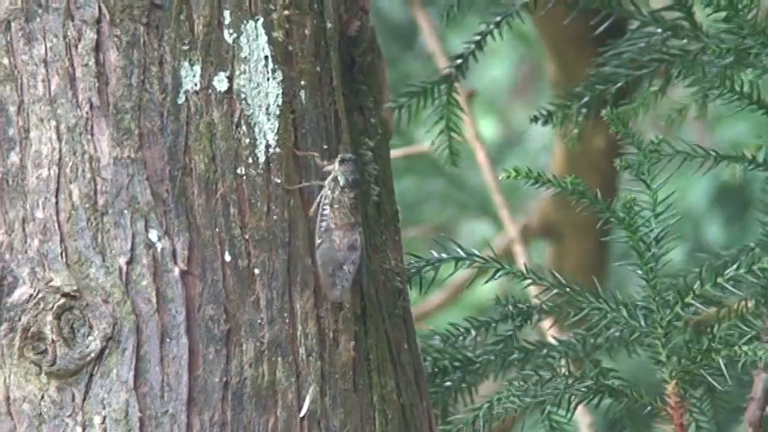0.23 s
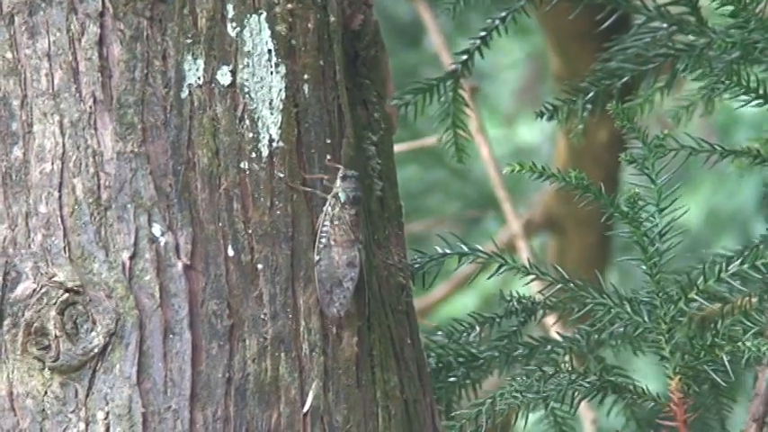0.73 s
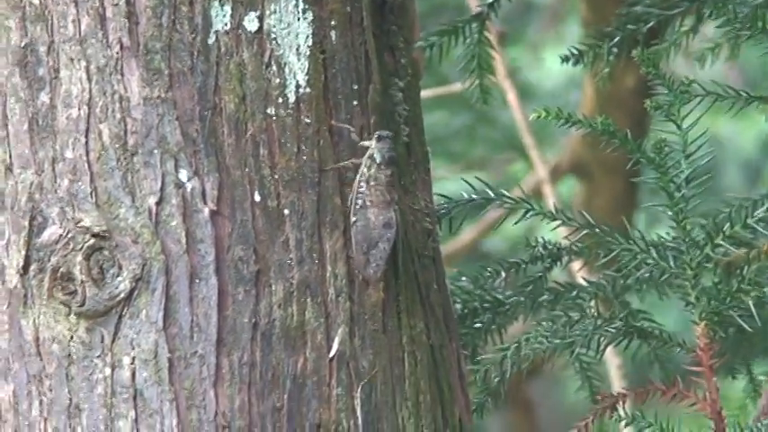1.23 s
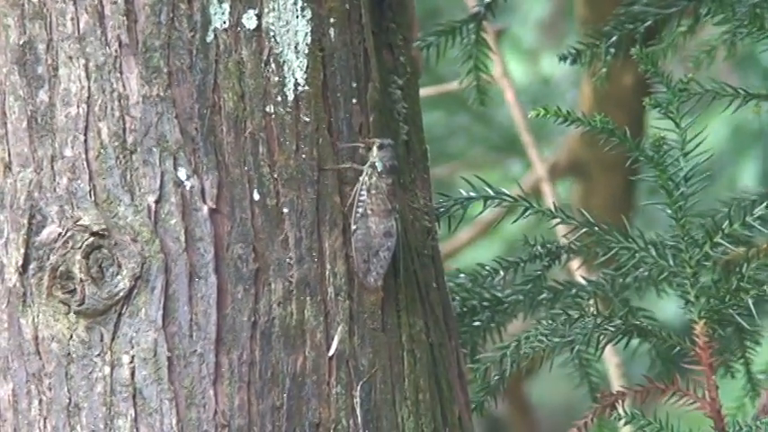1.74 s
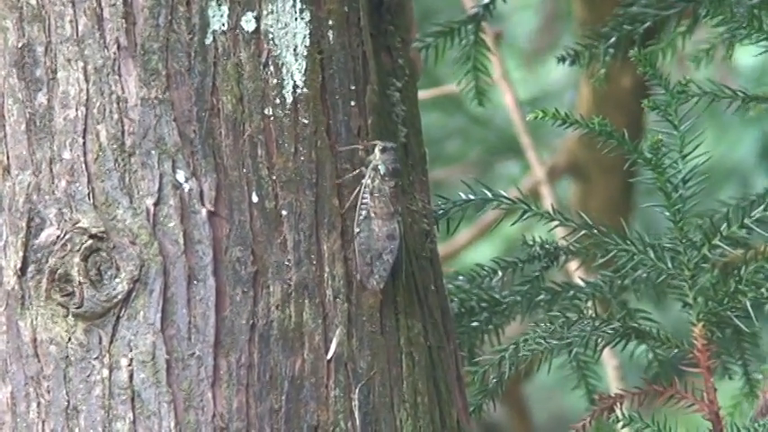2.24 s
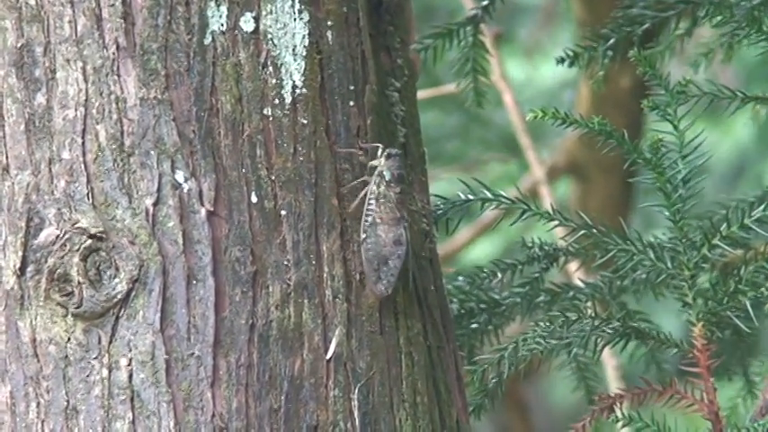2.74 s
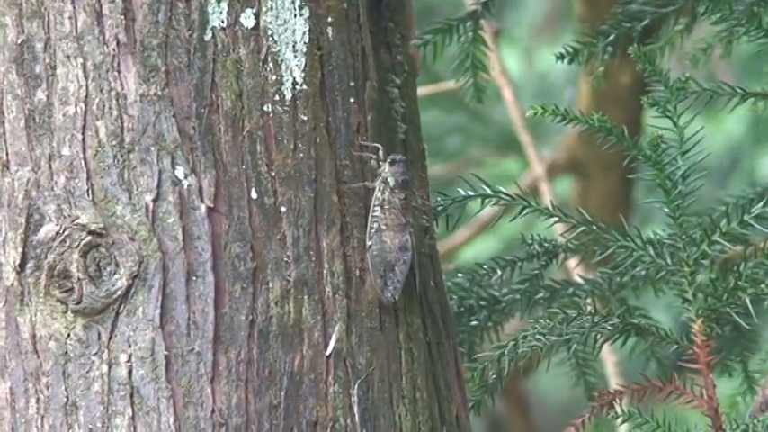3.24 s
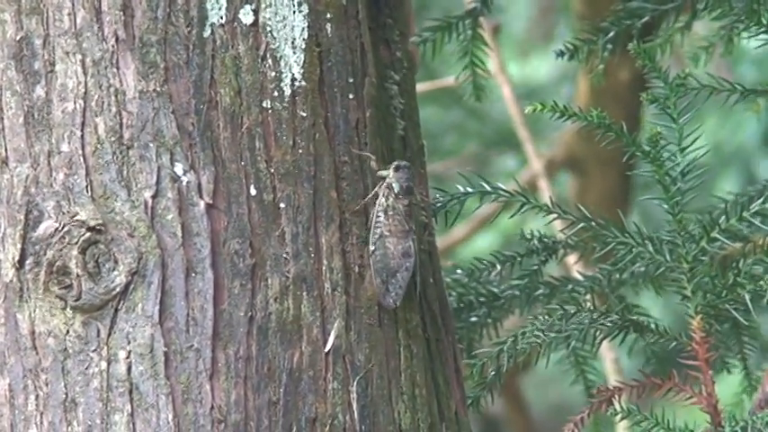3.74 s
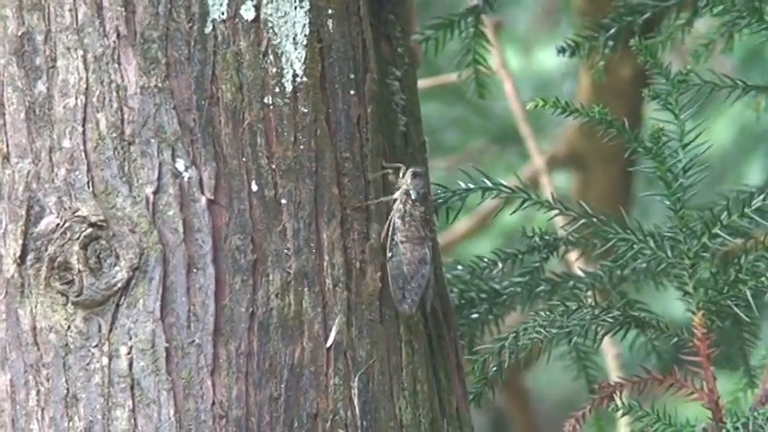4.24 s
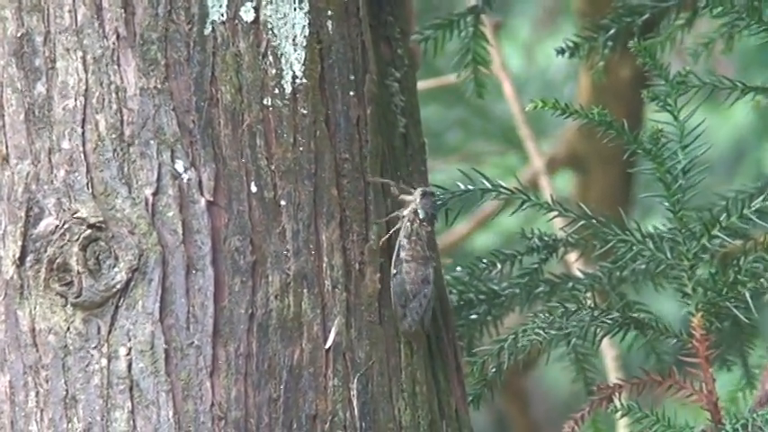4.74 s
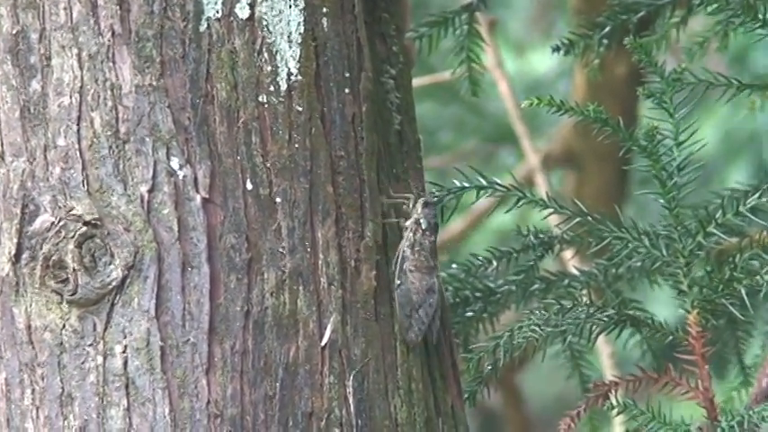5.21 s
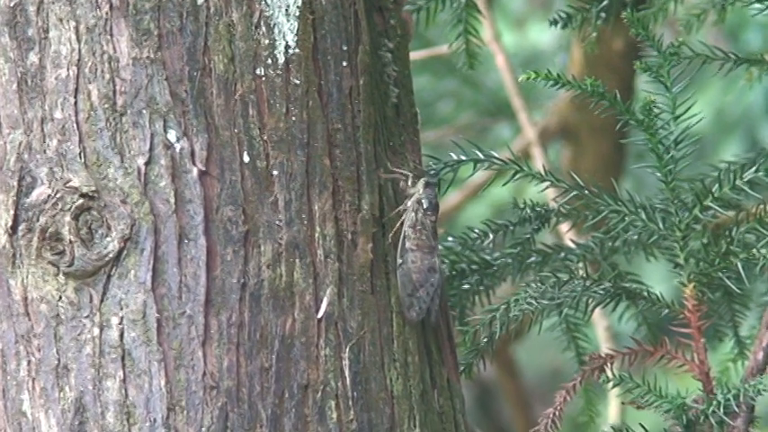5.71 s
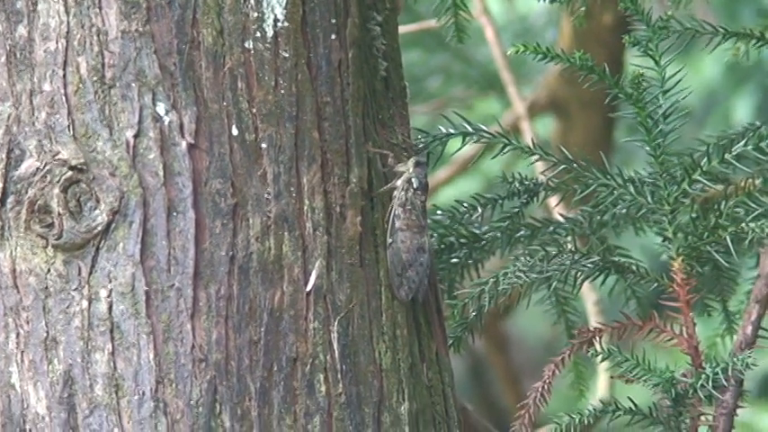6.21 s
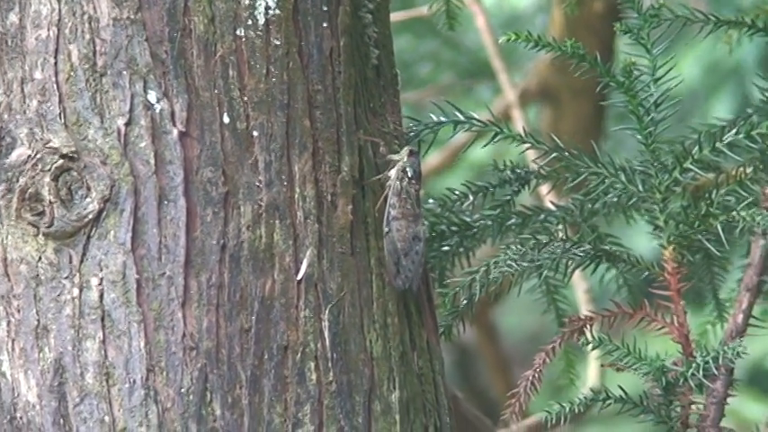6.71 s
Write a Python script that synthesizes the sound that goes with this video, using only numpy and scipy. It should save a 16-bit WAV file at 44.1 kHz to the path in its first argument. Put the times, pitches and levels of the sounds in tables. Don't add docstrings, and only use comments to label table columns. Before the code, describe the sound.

A cicada on a nearby trunk begins pulsing bright, buzzy chirps about three a second, with sagging drone between, over a dense hissing insect chorus in woodland.

```python
import sys
import numpy as np
from scipy import signal
from scipy.fft import rfft, irfft, next_fast_len
from scipy.io import wavfile

SR = 44100
rng = np.random.default_rng(int(sys.argv[2]) if len(sys.argv) > 2 else 0)


def to_wav(sig):
    pcm = np.clip(np.atleast_2d(sig), -1, 1) * 32767
    pcm = np.round(pcm).astype(np.int16)
    wavfile.write(sys.argv[1], SR, pcm.T)


def volts(x):
    e = np.asarray(x, float) / 20
    return 10 ** e


N = 306936
TIME = np.arange(N) / SR
LEFT_RIGHT = np.array([[1], [-1]])


def rms_one(x):
    return x / np.sqrt(np.mean(x ** 2) + 1e-20)


def in_time(rows, silent=None):
    s, *columns = np.transpose(rows)
    return [np.interp(TIME, s, column, silent, silent) for column in columns]


def at_hz(points, hz):
    point_hz, value = np.array(points)[:, :2].T
    return np.interp(np.log(hz + 1), np.log(point_hz), value)


def drift(rate):
    r = np.exp(-16 * np.pi * rate / SR)
    noise = rng.standard_normal(N // 8 + 8002)
    slow = signal.lfilter([1], [1, -2 * r, r * r], noise)[8000:]
    return np.interp(np.arange(N) / 8, np.arange(len(slow)), rms_one(slow))


def pan(x, db):
    return x * volts(LEFT_RIGHT * db / 2)


def swells(rows, rise, hold, fall):
    out = np.zeros(N)
    for s, db in rows:
        i = max(int((s - rise) * SR), 0)
        part = slice(i, i + SR // 2)
        t = TIME[part] - s
        attack = np.clip(t / rise + 1, 0, 1) ** 2
        out[part] += volts(db) * attack * np.exp(-np.maximum(t - hold, 0) / fall)
    return out


def spells(rows, edge, droop_db=0):
    out = np.zeros(N)
    for s, length, db in rows:
        part = slice(max(int((s - edge) * SR), 0), int((s + length + edge) * SR))
        t = TIME[part] - s
        shape = np.clip(np.minimum(t, length - t) / edge + .5, 0, 1) ** 2
        out[part] += volts(db + droop_db * (t - length / 2)) * shape
    return out


def bumps(rows, width):
    out = np.zeros(N)
    for s, db in rows:
        part = slice(max(int((s - 4 * width) * SR), 0), int((s + 4 * width) * SR))
        out[part] += volts(db) * np.exp(-((TIME[part] - s) / width) ** 2)
    return out


# frequency in Hz, likeness from 0 to 1.
LIKENESS = [(30, 0.4), (110, 0.98), (300, 0.52), (900, 0.15), (2000, 0.56), (5000, 0.97), (8000, 0.86),
            (10000, 0.78), (13000, 1)]


def hiss(spectrum, patchy_db, rate, count):
    size = next_fast_len(N)
    hz = np.arange(size // 2 + 1) * SR / size
    low, high = spectrum[0][0], spectrum[-1][0]
    level = volts(at_hz(spectrum, hz)) * (hz > low) * (hz < high)
    mid, side = rfft(rng.standard_normal((2, size))) * level
    alike = np.clip(at_hz(LIKENESS, hz), 0, 1)
    pair = np.sqrt(1 + alike) * mid + np.sqrt(1 - alike) * side * LEFT_RIGHT
    place = np.log((hz + 1) / low) / np.log(high / low) * (count - 1)
    shared = drift(rate / 4)
    out = 0
    for k in range(count):
        band = irfft(pair * np.clip(1 - abs(place - k), 0, 1), size)[:, :N]
        out = out + band * volts(patchy_db * (shared / 2 + drift(rate)))
    return rms_one(out)


# frequency in Hz, level in dB per Hz.
WOOD = [(76, -52), (130, -17.5), (1190, -24), (1520, -18), (2260, -17), (2950, -12), (3280, -14.5),
        (4200, -16.5), (5160, -21.5), (7000, -15.5), (9810, -53), (10700, -21), (13900, -43), (18400, -30)]


def woodland_floor():
    return pan(volts(-51) * hiss(WOOD, 1.0, 5.4, count=6), 0.19)


# time in seconds, level in dB.
BREEZE = [(0, -61.5), (1.1, -70), (2.3, -59.5), (3.5, -72.5), (6.96, -71)]
# peak in seconds, level in dB.
GUSTS = [(.33, -64), (1.25, -56), (1.56, -57), (1.68, -75), (1.96, -65), (2.19, -65), (2.33, -55),
         (2.4, -56), (2.67, -59)]
# peak in seconds, level in dB.
SURGES = [(4.1, -72), (4.5, -74), (4.75, -72), (5.25, -73), (5.5, -64.5), (5.72, -68), (6.0, -68),
          (6.3, -73), (6.87, -56)]
# frequency in Hz, level in dB.
MOTOR = [(629.8, -81.5), (769.8, -81), (839.8, -81.5)]


def wind_and_motor():
    breeze_db, = in_time(BREEZE)
    rumble = hiss([(18, -19), (40, -0.5), (105, -6.5), (210, -19.5)], 0.68, 11, count=2)
    wind = (volts(breeze_db) + bumps(GUSTS, width=0.027)) * rumble
    nears_s = 3.74
    load = volts(np.interp(TIME, [nears_s - .15, nears_s + 0.13], [-82, -71])) + bumps(SURGES, width=0.088)
    turn = 2 * np.pi * np.cumsum(111 * (1 + 0.0145 * drift(2.4))) / SR
    tone = np.sin(turn + .45 * LEFT_RIGHT) + volts(-15.0) * np.sin(2 * turn)
    hum = tone * load * volts(4.0 + 0.5 * drift(33))
    whine = 0
    for hz, db in MOTOR:
        whine = whine + volts(db + 4.5) * np.sin(2 * np.pi * hz * TIME) * volts(3.7 * drift(3.5))
    return pan(wind, 2.2) + hum + whine


# time in seconds, lower-pitched crowd in dB, higher-pitched crowd in dB.
CHORUS = [(0, -40, -51), (1.2, -38.5, -49), (2.75, -36, -43), (3.5, -37.5, -42), (4, -42.5, -36.5),
          (5.3, -45.5, -38.5), (5.87, -42.5, -37.5), (6.96, -42, -41.5)]
# frequency in Hz, level in dB per Hz.
LOW_CROWD = [(2530, -77), (4300, -23.5), (4730, -17), (4850, -10.5), (5210, -6.5), (5680, -2), (6250, 0),
             (6650, 2), (7270, 1), (7780, -14.5), (8250, -15.5), (8620, -46), (9000, -20), (11700, -35),
             (19800, -120)]
HIGH_CROWD = [(5600, -35), (6500, -8), (7100, -6.5), (7400, -4), (7800, -5), (8400, -14), (8650, -19),
              (9500, -33), (10500, -26.5), (12500, -33), (13600, -34), (14000, -45)]


def far_chorus():
    low_db, high_db = in_time(CHORUS)
    low = volts(low_db - 0.5) * hiss(LOW_CROWD, 1.0, 26, count=4)
    high = volts(high_db) * hiss(HIGH_CROWD, 0.62, 23, count=4)
    return pan(low + high, -3.0)


# frequency in Hz, level in dB per Hz.
CRICKET = [(12400, -26), (13300, -16), (14100, -32), (15000, -26), (15500, -10), (15900, -10), (16500, -11),
           (17300, -15), (18300, -15)]


def bush_cricket():
    throbs = [(s, -56.5) for s in np.arange(0.1, N / SR + .1, .245)]
    level = bumps(throbs, width=0.051) + volts(-65)
    return pan(level * hiss(CRICKET, 1.6, 18, count=3), -1.4)


# start in seconds, length in seconds, level in dB.
FAR_PHRASES = [
    [(.6, 1.24, -64.5), (2.2, 2.1, -67.5), (6.7, 0.35, -76)],
    [(-.2, 0.34, -59.5), (1.7, 3.56, -62), (5.8, .5, -59.5), (6.3, 0.69, -57)],
]
# pulses in Hz, throb in Hz, a throb peak in seconds, raise of odd partials and equal cut of
# even ones in dB.
FAR_PULSE_HZ = [265, 254.5]
FAR_THROB_HZ = [7.1, 7.3]
FAR_THROB_PEAK_S = [.69, 6.635]
FAR_ODD_DB = [4, 0]
# frequency in Hz, level in dB.
FAR_BODY = [(1500, -8), (1780, -11), (2030, -16), (2300, 0), (2600, -1), (2900, -2), (3100, -11),
            (3600, -16), (4200, -22), (4750, -15), (5400, -15)]


def far_singers():
    out = 0
    singers = zip(FAR_PHRASES, FAR_PULSE_HZ, FAR_THROB_HZ, FAR_THROB_PEAK_S, FAR_ODD_DB)
    for phrases, hz, throb_hz, peak_s, odd_db in singers:
        level = volts(-82) + spells(phrases, edge=0.15)
        throb = np.cos(2 * np.pi * throb_hz * (TIME - peak_s) + .15 * drift(1.5))
        pulse_hz = hz * (1 + 0.0054 * throb + .002 * drift(0.3615))
        pulse = np.exp(2j * np.pi * np.cumsum(pulse_hz) / SR)
        fades = volts(1.5 * drift(2.5))
        wave = pulse ** 5 * level * (.62 + .38 * throb)
        for k in range(6, 22):
            wave = wave * pulse * np.exp(1j * k)
            body = volts(at_hz(FAR_BODY, hz * k) + 5.5 - odd_db * (-1) ** k)
            out = out + body * np.roll(fades, k * SR // 3) * wave.real
    return pan(out, -.5)


# start in seconds, length in seconds, frequency in Hz, level in dB.
NOTES = [(.07, .45, 3385, -62), (.15, .25, 2255, -66), (.4, .2, 3650, -66), (.9, .2, 3345, -69),
         (1.69, .1, 3790, -55), (1.8, .06, 3750, -54), (2.0, 1.6, 5039, -61), (4.6, 2.3, 4737, -68),
         (4.6, .5, 3375, -62), (5.2, .35, 3345, -61), (4.8, .12, 3535, -51), (4.96, .12, 3572, -54),
         (5.2, .1, 3525, -52), (5.31, .09, 3562, -54), (5.6, .2, 3562, -52), (5.77, .13, 3740, -53),
         (5.85, .12, 3455, -54), (5.86, .15, 3910, -54), (6.2, .16, 3562, -55), (6.2, .08, 3910, -54),
         (6.5, .3, 3900, -60), (5.62, .2, 7390, -45), (6.34, .26, 7400, -44), (6.8, .14, 7403, -43),
         (5.65, .3, 8220, -56), (6.66, .07, 570, -70), (6.78, .08, 775, -69), (6.79, .08, 388, -75),
         (6.92, .05, 640, -68)]


def held_notes():
    out = np.zeros(N)
    waver, flicker = 1 + 0.002 * drift(6.6), volts(2.5 * drift(25))
    for s, length, hz, db in NOTES:
        part = slice(int((s - .02) * SR), int((s + length + 0.023) * SR))
        t = TIME[part] - s
        edge = np.clip(np.minimum(t + 0.027, length + 0.012 - t) / 0.017, 0, 1)
        tone = np.sin(2 * np.pi * hz * np.cumsum(waver[part]) / SR)
        out[part] += volts(db + 5.0) * edge * flicker[part] * tone
    return out


# start in seconds, level in dB, frequency in Hz.
TICKS = [(.262, -50, 676), (4.672, -50, 1250), (4.718, -48, 1380), (5.782, -49, 1148), (6.421, -54, 1146),
         (6.5, -52.5, 982), (3.222, -42, 11560), (3.88, -30, 11060), (4.064, -38, 10750),
         (4.665, -31.5, 10880), (4.71, -37, 10400), (4.884, -35, 11500), (4.91, -38, 11150)]


def twigs():
    out, t = np.zeros(N), np.arange(SR // 20) / SR
    for s, db, hz in TICKS:
        ring = np.sin(2 * np.pi * hz * t) * np.exp(-t * hz / 2.5)
        out[int(s * SR):][:len(t)] += volts(db + 6.5) * ring * np.clip(t * hz / 0.36, 0, 1)
    return out


# upper muscle side line in dB, lower side line in dB,
# blur from 0 to 1, left minus right in dB.
PARTIALS = [(-17, -28, .75, -1.5), (-14, -22, .26, -3.0), (-24, -7, .45, -1), (-26, -14, .3, -.3),
            (-26, -15, .45, -4), (-22, -16, .5, -2), (-20, -16, .6, -1.5)]


def tymbal(rib_hz, levels, clear=1, rough=1, tilt=0):
    click = np.exp(2j * np.pi * np.cumsum(rib_hz * (1 + 0.001087 * drift(31.75))) / SR)
    muscle_hz = 289 * (1 + .03 * drift(40))
    pull = np.exp(2j * np.pi * np.cumsum(muscle_hz) / SR) * volts(2.5 * drift(30))
    blur = rough * (drift(151) + 1j * drift(121))
    out, wave = 0, np.sqrt(2)
    for k, (level, (up_db, down_db, share, side_db)) in enumerate(zip(levels, PARTIALS)):
        wave = wave * click
        lines = 1 + volts(up_db) * pull + volts(down_db) * pull.conj()
        shape = clear * lines + share * (1 + tilt * max(k - 1, 0)) * blur
        out = out + pan(level * (shape * wave).real, side_db)
    return out


def rib_rate(table, sag):
    s, hz = np.array(table)[:, 0] - .02, np.array(table)[:, 2] / 4
    last = np.clip(np.searchsorted(s, TIME) - 1, 0, None)
    since = TIME - s[last]
    paused = np.diff(s, prepend=s[0])[last] > .1
    sweep = .03 * paused * np.exp(-(since / .014) ** 2) - .03 * (since < 0)
    tiring = np.clip(1 - .2 * (s[last] - s[0]), .3, 1)
    return hz[last] * (1 - sag * tiring * np.clip(since - .09, 0, .24) - sweep)


# 4th partial in Hz, 3rd partial in dB re the 4th, 5th partial in dB re the 4th.
ACCENT_BODY = [(7630, -11, -18.5), (7908, -10.5, -6)]


def accents(table, hold, second_db=0, third_db=0):
    s, db, hz, first = np.transpose(table)
    body_hz, *body_db = np.transpose(ACCENT_BODY)
    third, fifth = [np.interp(hz, body_hz, column) for column in body_db]
    relative = [first, first + 0.42 + second_db, third + third_db, 0 * s, fifth, fifth - 15, fifth - 25]
    return [swells(zip(s + 0.0058, db + r - 7), rise=0.036, hold=hold, fall=0.0079) for r in relative]


# time in seconds, peak in dB, 4th partial in Hz, 1st partial in dB re the 4th.
EARLY = [(0.109, -28, 7680, -18), (0.5615, -30.5, 7680, -17.5), (1.0256, -30.5, 7640, -17.5),
         (1.533, -33.5, 7660, -18.5)]
# time in seconds, peak in dB, octave above in dB re it.
LOW_CHIRPS = [(0.29, -29.5, -4), (0.855, -30, -4), (1.4444, -31, -5.5), (2.6308, -32, -14),
              (3.1839, -38.5, 18), (4.0706, -31, -7), (4.8054, -34.5, 9), (5.414, -32, -17),
              (5.9449, -33, -1), (6.2122, -36, 4), (6.5089, -31.5, -9)]


def neighbours():
    early_levels = accents(EARLY, .03, second_db=8, third_db=-10)
    early = tymbal(rib_rate(EARLY, sag=0), early_levels, rough=1.1)
    s, db, octave = np.transpose(LOW_CHIRPS)
    levels = [swells(zip(s, db - 11.5 + r), rise=0.006, hold=0.035, fall=0.012) for r in (0 * s, octave)]
    chirps = tymbal(np.full(N, 1785.), levels, clear=0.43, rough=0.67)
    return pan(early, -3.0) + pan(chirps, 2.2)


# time in seconds, peak in dB, 4th partial in Hz, 1st partial in dB re the 4th.
ACCENTS = [(2.0594, -29, 7670, -21), (2.0952, -26.5, 7860, -13), (2.1292, -30.5, 7858, -15),
           (2.4213, -24, 7885, -12), (2.7228, -24, 7864, -13), (3.025, -24.5, 7836, -13),
           (3.3257, -23.5, 7806, -17.5), (3.6427, -23.5, 7787, -17), (3.9705, -20.5, 7743, -40),
           (4.3305, -19.5, 7723, -25), (4.8252, -20.5, 7690, -17.5), (5.1288, -20.5, 7673, -17.5),
           (5.4876, -21.5, 7670, -18.5), (5.879, -21.5, 7625, -17.5), (6.248, -22, 7630, -17.5),
           (6.6353, -23, 7630, -18.5)]
# time in seconds, wash of the 2nd partial in dB.
EFFORT = [(1.66, -64), (1.8, -54), (1.96, -46), (2.11, -39.5), (4.4, -39), (4.76, -44), (5.3, -48.5),
          (5.9, -53), (6.2, -58.5), (6.96, -61.5)]
# start in seconds, length in seconds, level in dB.
BURSTS = [(2.125, 0.15, -31), (2.295, 0.075, -30), (2.505, .11, -31), (2.625, 0.051, -29.5),
          (2.815, 0.059, -30.5), (2.89, .09, -30), (3.125, 0.065, -31.5), (3.205, 0.079, -31.5),
          (3.42, 0.076, -30.5), (3.495, 0.08, -33.5), (3.74, 0.093, -30.5), (3.855, 0.053, -36),
          (4.075, 0.1, -34), (4.21, 0.045, -30), (4.44, 0.089, -37), (4.53, 0.043, -31),
          (4.605, 0.034, -34.5)]
DRONE_UPPER_DB = [-15, -11, -25, -33.5, -51]


def near_cicada():
    rib_hz = rib_rate(ACCENTS, sag=.11)
    effort_db, = in_time(EFFORT, -120)
    bursts = spells(BURSTS, edge=.012, droop_db=3)
    lift_db = 20 * np.log10(1 + bursts * volts(drift(38) - effort_db))
    second_db = effort_db + lift_db
    first_db = -44 + 0.5 * (effort_db + 38.5) + 0.31 * lift_db
    clear = np.clip((second_db + 42) / 9, .1, 1)
    lower = [volts(first_db - 3.5), volts(second_db + 1.0) * (3.0 - 2 * clear)]
    upper = [volts(0.71 * second_db + db - 12.5) for db in DRONE_UPPER_DB]
    drone = tymbal(rib_hz, lower + upper, clear, tilt=0.25)
    bright = tymbal(rib_hz, accents(ACCENTS, .036), rough=.85)
    return pan(drone, -.4) + pan(bright, .3)


# delay in seconds, level in dB.
ECHOES = [
    (.022, -16),
    (.046, -20.5),
]


def forest(x, t60):
    t = np.arange(int(.8 * SR)) / SR
    mid, side = rng.standard_normal((2, len(t))) * volts(-60 * t / t60) * np.clip(t / 0.0022, 0, 1)
    tail = (mid + 0.36 * side * LEFT_RIGHT) * volts(-10.5) / np.sqrt(np.sum(mid ** 2))
    for delay, db in ECHOES:
        i = int(delay * SR)
        tail[[0, 1], [i, i + 2]] += volts(db)
    return pan(signal.fftconvolve(x[None], tail, axes=1)[:, :N], 0.94)


def scene():
    near = near_cicada() + neighbours() + twigs() + held_notes()
    scatter = forest(near.mean(axis=0), t60=.5)
    background = woodland_floor() + wind_and_motor() + far_chorus() + bush_cricket()
    return near + scatter + far_singers() + background


def roll_off(x):
    return signal.sosfilt(signal.butter(12, 18390, fs=SR, output="sos"), x)


def record(dry):
    x = dry * np.clip((TIME - .061) / 0.023, 0, 1)
    x = signal.sosfilt(signal.cheby2(16, 64, 18530, fs=SR, output="sos"), x)
    return roll_off(x)


dry = scene()
out = record(dry)
to_wav(out)
```